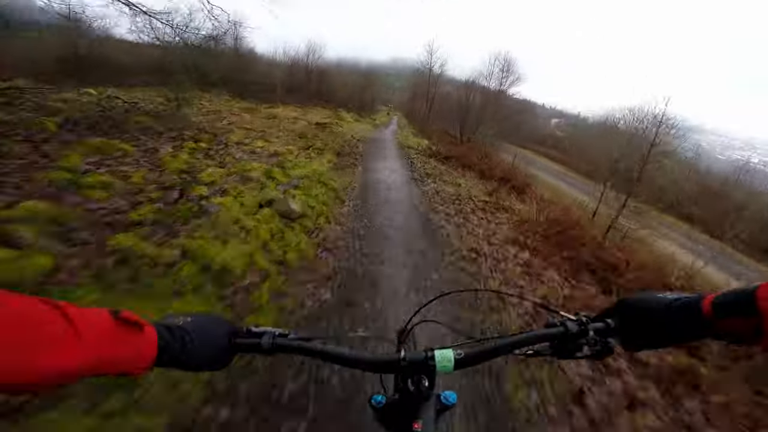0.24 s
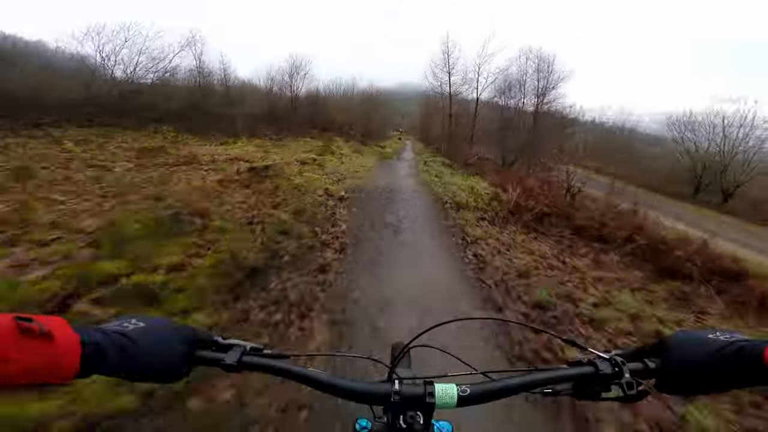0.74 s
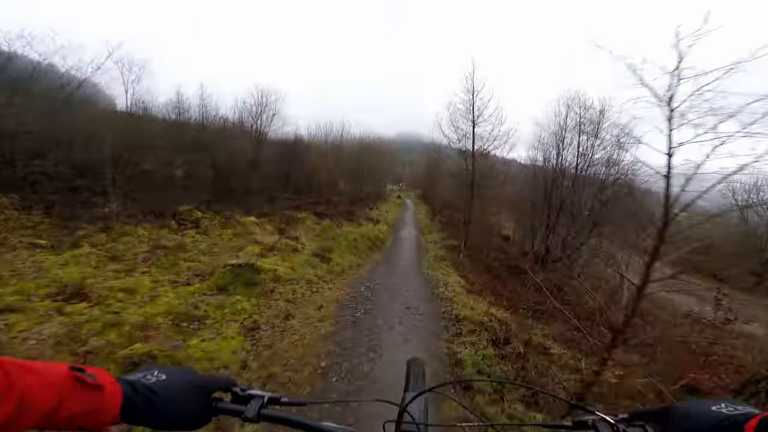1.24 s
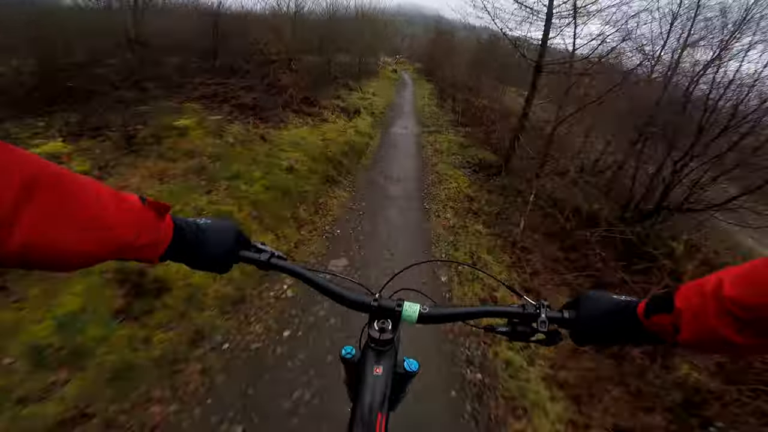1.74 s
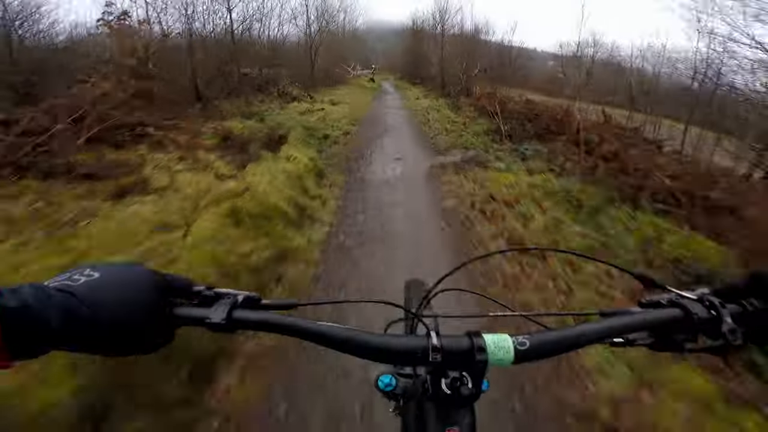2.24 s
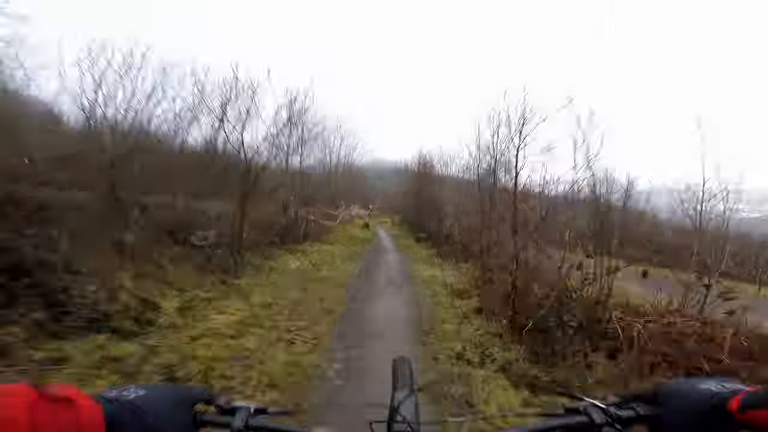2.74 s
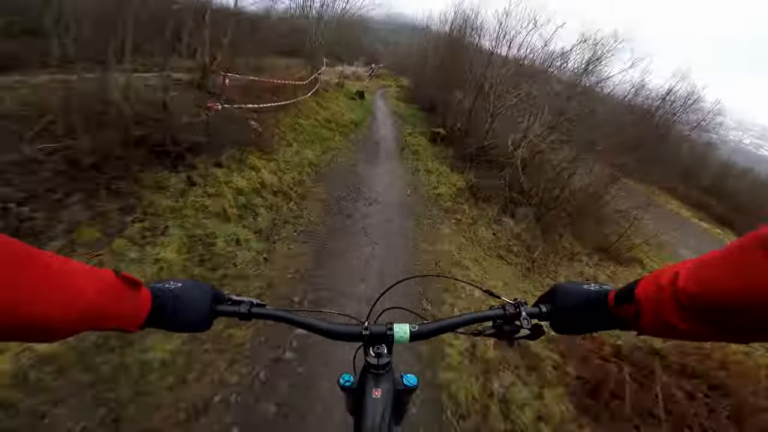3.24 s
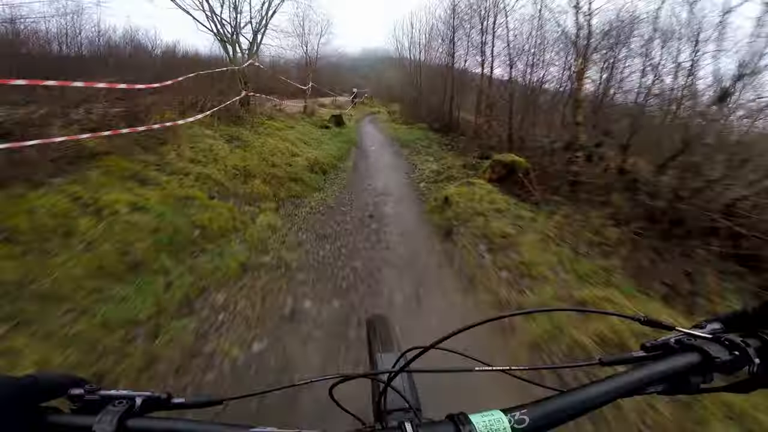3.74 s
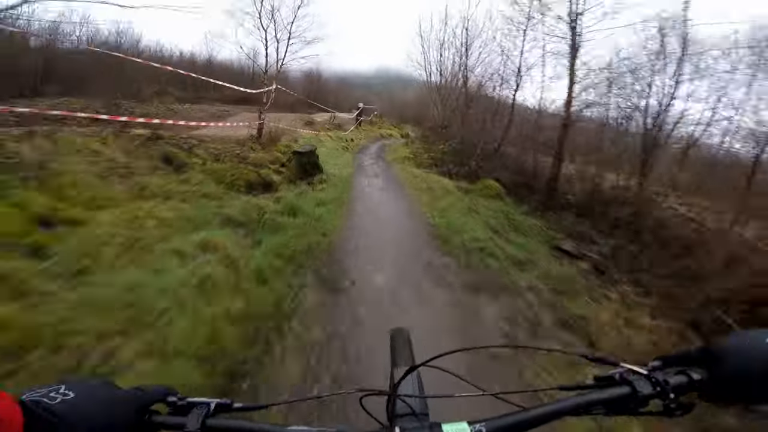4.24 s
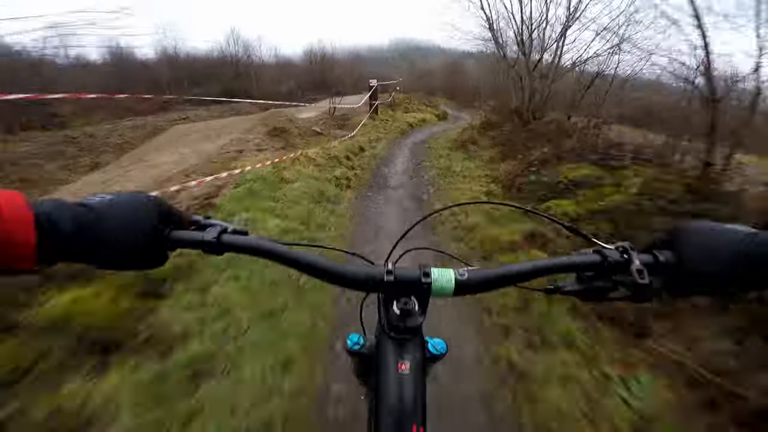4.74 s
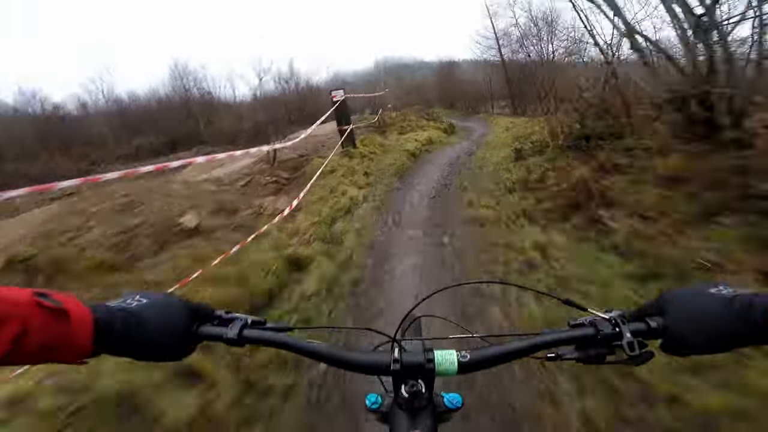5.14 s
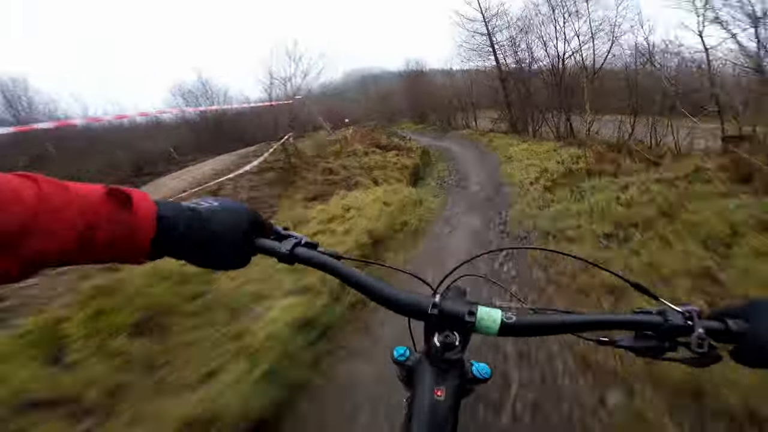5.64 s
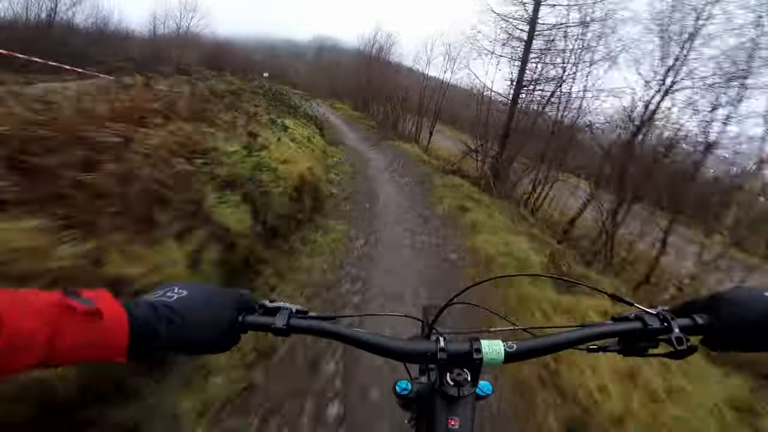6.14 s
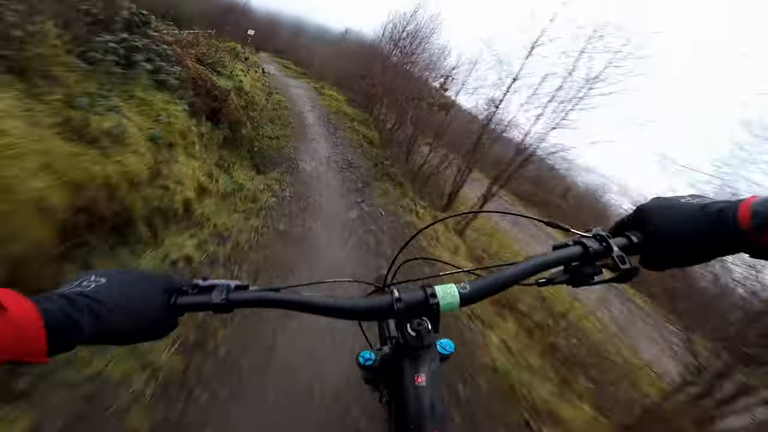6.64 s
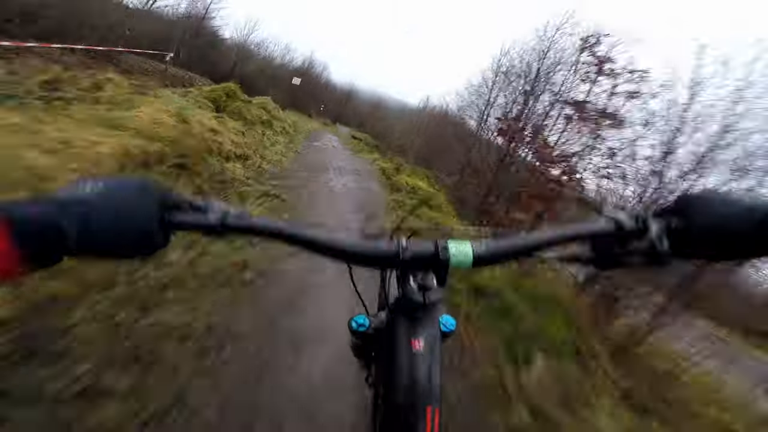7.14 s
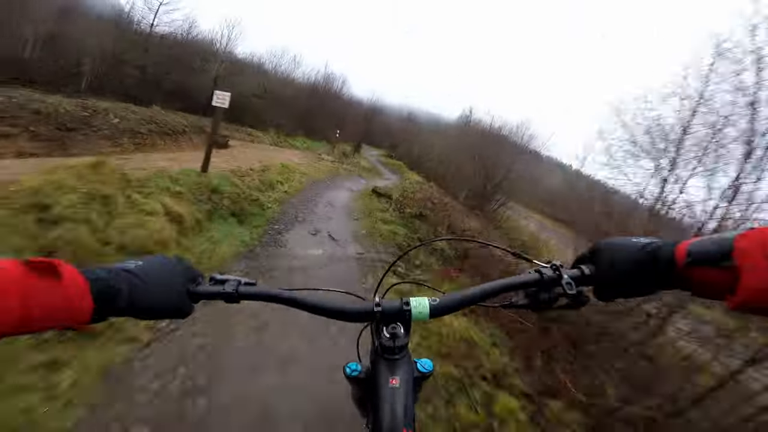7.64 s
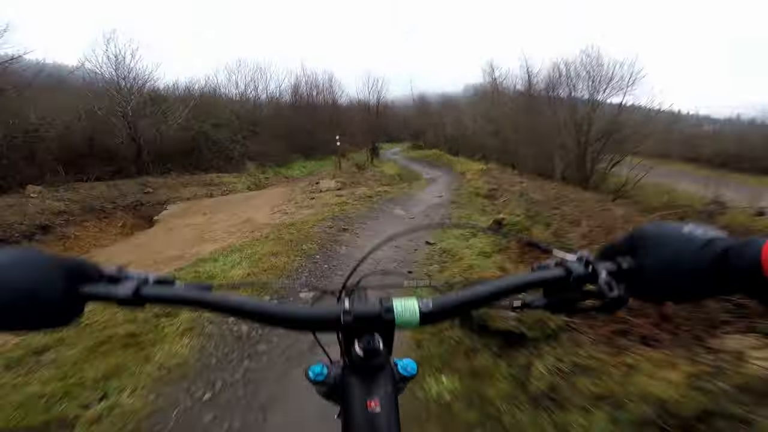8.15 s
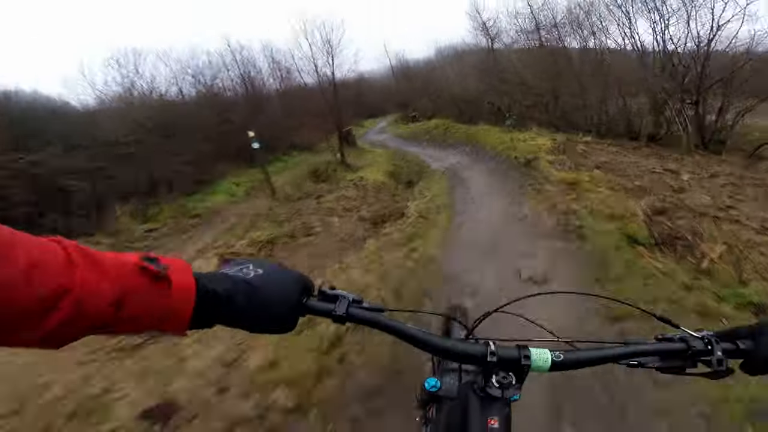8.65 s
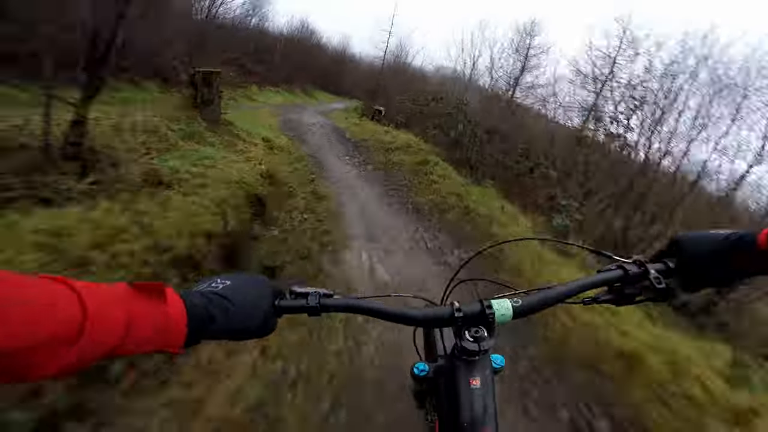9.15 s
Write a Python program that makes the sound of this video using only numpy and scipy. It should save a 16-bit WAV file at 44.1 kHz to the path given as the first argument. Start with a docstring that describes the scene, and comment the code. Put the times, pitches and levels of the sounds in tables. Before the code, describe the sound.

Outdoor ride lasting about 9.4 seconds, heard close from the rider's chest, with no room echo. Gusty wind roars throughout over low, fluttering buffeting, while tyres hiss and crunch on wet gravel. Dry knocks begin at once; a chain rattle comes at 0.9 and a tiny high squeak near 1.1. From 1.2 to 1.8 the wind dulls and the tyres nearly vanish, then a hard cluster of clicks and rattle lands around 2. Another faint squeak comes at 2.7, followed by a lull until a low mount thump at 3.35 and sharp hits with a spray swish at 3.5-3.6. Wind then stays strong and bright until about 7, with a heavy crack at 4.57 and frequent knocks from 5 to 6.7. The densest rattling burst is at 7.0-7.2. Tyres drop away around 7.4, a thump and knock hit at 7.87, and ragged, weaker wind and crunching gravel continue to the end.

```python
"""Wind tears in gusts at a camera on a rider's chest as a mountain bike runs fast down a wet gravel trail. The
air is coloured noise whose level and pitch follow the stream, over slow swings that buffet the microphone. The
tyres are hissing noise and ringing grains of grit, falling quiet where the bike goes light. Stones, cables and
the chain's hardest slaps click as struck modes, the chain rattles in bursts of small slaps in the compressions,
and decaying sines make the camera mount thump; there are also brief squeaks and swishes of spray."""
import sys
import numpy as np
from scipy import signal
from scipy.fft import rfft, irfft, next_fast_len
from scipy.io import wavfile
from scipy.ndimage import uniform_filter1d, map_coordinates

SR = 44100
rng = np.random.default_rng(int(sys.argv[2]) if len(sys.argv) > 2 else 0)


def store_pcm(level_fs):
    """Save levels as 16-bit WAV."""
    pcm = np.round(np.clip(level_fs, -1, 1) * 32767).astype(np.int16)
    wavfile.write(sys.argv[1], SR, np.atleast_2d(pcm).T)


N = 413658
TIME = np.arange(N) / SR

# The bike's dead modes, heard through the camera case.
# Each row: centre pitch in Hz, width in Hz, average strength in dB.
KNOCK_MODES = [(2205, 810, -1), (2654, 960, 6.5), (3170, 1270, 5.5), (3693, 830, -1)]


def from_db(db):
    """Decibels to gain."""
    return 10 ** (np.asarray(db) / 20)


def rms_one(x):
    """Scale to unit rms."""
    return x / np.sqrt(np.mean(x ** 2) + 1e-20)


def in_time(rows):
    """One curve per column after the time in seconds, joined by straight lines."""
    s, *columns = np.transpose(rows)
    return [np.interp(TIME, s, column) for column in columns]


def drift(rate):
    """Random wandering of spread 1: noise through two equal low-pass poles at a rate in Hz."""
    step = 20  # samples between the points of the curve
    settle = 2000  # points left out while the filter settles
    pole = np.exp(-2 * np.pi * rate * step / SR)
    points = rng.standard_normal(N // step + settle + 2)
    slow = signal.lfilter([1], [1, -2 * pole, pole * pole], points)[settle:]
    return np.interp(np.arange(N) / step, np.arange(len(slow)), rms_one(slow))


def colour(x, spectrum):
    """Give x a spectrum that falls away beyond its ends; rms 1."""
    size = next_fast_len(N, True)
    hz = np.maximum(np.arange(size // 2 + 1) * SR / size, 1)
    points_hz, points_db = np.transpose(spectrum)
    skirts = np.minimum(1, np.minimum(hz / points_hz[0], points_hz[-1] / hz)) ** 2
    gain = skirts * from_db(np.interp(np.log(hz), np.log(points_hz), points_db))
    return rms_one(irfft(rfft(x, size) * gain, size)[:N])


def noise(spectrum):
    """Coloured noise of rms 1."""
    return colour(rng.standard_normal(N), spectrum)


def split(x, hz):
    """The parts of x below and above a frequency."""
    low = signal.sosfiltfilt(signal.butter(4, hz, fs=SR, output="sos"), x)
    return low, x - low


def soften(x, hz, order):
    """A contact of finite length has little energy above some frequency."""
    return signal.sosfilt(signal.butter(order, hz, fs=SR, output="sos"), x)


def add(out, s, sound):
    """Mix a short sound in at a time in seconds."""
    start = max(0, int(s * SR))
    out[start:start + len(sound)] += sound[:max(0, N - start)]


def resonance(x, hz, width):
    """One mode, its width in Hz; a unit click leaves unit energy."""
    r, w = np.exp(-np.pi * width / SR), 2 * np.pi * hz / SR
    return np.sqrt((1 - r * r) / 2) * signal.lfilter([1, 0, -1], [1, -2 * r * np.cos(w), r * r], x)


def resonate(x, modes):
    """Ring modes side by side, in alternating sign; white noise keeps its power."""
    out, total = 0, np.linalg.norm(from_db(np.array(modes)[:, 2]))
    for k, (hz, width, db) in enumerate(modes):
        # the tiny offset keeps the silent filter from slowing down
        out = out + (-1) ** k * from_db(db) / total * resonance(x + 1e-18, hz, width)
    return out


def strike(times, level_db, modes, scatter_db=1.0, tilt_db=0, detune_octaves=0.073):
    """Each click rings the modes at a pitch and with strengths of its own, tilted per octave; 0 dB is unit energy."""
    out, click = np.zeros(N), signal.unit_impulse(SR // 100)
    mode_hz, mode_width, mode_db = np.transpose(modes)
    luck = rng.standard_normal((len(times), len(modes) + 1))
    tilts = np.outer(tilt_db, np.log2(mode_hz))
    strengths = from_db(mode_db + tilts + scatter_db * luck[:, 1:])
    pitches = 2 ** (detune_octaves * np.clip(luck[:, 0], -2, 2))
    for s, db, strength, pitch in zip(times, level_db, strengths, pitches):
        ring = 0
        for k in range(len(modes)):
            mode = resonance(click, pitch * mode_hz[k], mode_width[k])
            ring = ring + (-1) ** k * strength[k] * mode
        add(out, s, from_db(db) * ring / np.linalg.norm(ring))
    return out


def floor_hiss(level_db=-58):
    """Faint steady hiss that shows in the lulls."""
    # Colour of the hiss. Each row: frequency in Hz, density in dB per Hz.
    hiss_spectrum = [(4000, 0), (9500, 3), (11500, -8), (15000, -15)]
    return from_db(level_db) * noise(hiss_spectrum)


def buffeting(swing_gain_db=1.5, rumble_gain_db=0.0, lumpy_db=4.5, evenness=0.55):
    """The shaking chest pushes the diaphragm to and fro, over a lumpy rumble of large eddies."""
    # How hard the trail shakes the rider's chest. Each row: time in seconds, relative pressure swing in dB.
    chest_shake = [(0.0, -19), (1.04, -11), (1.56, -33.5), (1.88, -26), (1.93, -7.5), (2.4, -22.5),
                   (2.56, -9), (3.29, -30.5), (3.37, -16), (4.49, -14), (4.65, -19), (6.63, -12.5),
                   (6.76, -21.5), (7.11, -7.5), (7.52, -22.5), (8.07, -12.5), (8.41, -19.5), (9.38, -11.5)]
    # The low rumble over time. Each row: time in seconds, relative level in dB.
    rumble_course = [(0.0, -27.5), (1.5, -32.5), (3.2, -26.5), (4.1, -25), (5.1, -26), (5.7, -23),
                     (6.8, -29.5), (7.8, -29.5), (8.2, -30), (8.8, -25), (9.38, -28.5)]
    # Colours of the swings and of the rumble. Each row: frequency in Hz, density in dB per Hz.
    swing_spectrum = [(5, 0), (10, -10.5), (15, 8), (21, -1.5), (27, 4.5), (36, -10), (48, -16), (70, -51)]
    rumble_spectrum = [(25, -27), (45, 3.5), (70, -2.5), (110, -6.5), (170, -10), (300, -18), (600, -23)]
    shake_db, = in_time(chest_shake)
    rumble_db, = in_time(rumble_course)
    swings = noise(swing_spectrum)
    size = np.abs(signal.hilbert(swings, next_fast_len(N, True)))[:N]
    # successive swings are of much the same size
    swings = rms_one(swings / (uniform_filter1d(size, size=1500) + 0.045) ** evenness)
    rumble = noise(rumble_spectrum) * from_db(lumpy_db * np.clip(drift(rate=57), -2, 2))
    return swings * from_db(shake_db + swing_gain_db) + rumble * from_db(rumble_db + rumble_gain_db)


def gusts(full_wind_db=-23, gust_db=0.43, lull_gust_slope=0.024):
    """The stream wavers several times a second, more widely when it is weak: dB above a full stream."""
    # Strength of the air stream over the camera. Each row: time in seconds, strength in dB as upper rush.
    air_stream = [(0.0, -28), (0.03, -30), (0.095, -21), (0.125, -25), (0.19, -23.5), (0.27, -19.5),
                  (0.41, -22.5), (0.47, -33), (0.53, -24), (0.58, -26), (0.705, -18.5), (0.745, -26.5),
                  (0.79, -24), (0.94, -23.5), (1.04, -30), (1.15, -34), (1.27, -32.5), (1.33, -35),
                  (1.45, -31), (1.55, -35), (1.64, -37), (1.69, -26.5), (1.77, -30), (1.93, -24),
                  (2.01, -31.5), (2.1, -30.5), (2.14, -24.5), (2.28, -21), (2.39, -26), (2.45, -23.5),
                  (2.52, -26.5), (2.59, -25), (2.73, -42.5), (2.81, -31), (2.93, -34.5), (3.0, -33.5),
                  (3.16, -43.5), (3.23, -29.5), (3.46, -19), (3.53, -22), (3.57, -27.5), (3.69, -31),
                  (3.73, -24), (4.07, -22), (4.2, -24), (4.5, -22), (4.58, -26), (4.66, -22), (4.82, -18.5),
                  (4.98, -24.5), (5.06, -23), (5.13, -30), (5.31, -20.5), (5.48, -23), (5.72, -21),
                  (6.02, -21), (6.6, -23), (6.82, -20), (6.97, -21), (7.17, -26), (7.24, -28.5),
                  (7.34, -25.5), (7.39, -30), (7.43, -22.5), (7.47, -28.5), (7.57, -27.5), (7.62, -31),
                  (7.72, -34.5), (7.85, -32.5), (8.06, -31.5), (8.13, -34), (8.21, -38), (8.27, -29),
                  (8.35, -27), (8.42, -34), (8.49, -25), (8.53, -38.5), (8.65, -34.5), (8.81, -27),
                  (8.96, -29.5), (9.07, -25), (9.38, -33)]
    stream_db, = in_time(air_stream)
    excess_db = stream_db - full_wind_db
    depth_db = gust_db + lull_gust_slope * np.clip(-excess_db, 0, 8)
    return excess_db + depth_db * np.clip(drift(rate=11.96), -2, 2)


def puffs(slack_s=0.024, slack_share=1.0, rise_s=0.0057, fall_s=0.011):
    """The flow slackens for an instant before each eddy, then jumps: a level in dB."""
    # The strongest single eddies breaking on the camera.
    # Each row: time of the jump in seconds, relative rise in dB.
    single_eddies = [(0.215, -0.5), (0.482, 6), (0.835, 3.5), (1.262, 0), (1.605, 13), (1.671, 6),
                     (1.697, 6), (2.415, 5.5), (2.81, 6), (2.894, 7), (2.948, 5), (3.003, 6), (3.278, 2.5),
                     (4.602, 3), (5.927, 3), (7.421, 7), (7.636, 5), (7.787, 6.5), (7.998, 4), (8.696, 7.5),
                     (8.777, 8.5), (8.878, 6), (8.997, 7)]
    out, t = np.zeros(N), TIME[:SR // 10]
    corners_s = np.cumsum([0, slack_s, rise_s, fall_s])
    shape = np.interp(t, corners_s, [0, -slack_share, 1, 0])
    for s, db in single_eddies:
        add(out, s - slack_s - rise_s / 2, db * shape)
    return out


def with_the_flow(x, gust_db, shift_octaves, octaves_per_db=0.04):
    """Faster air sheds faster eddies: the whole roar slides up in a gust and down in a lull."""
    speed = 2 ** (shift_octaves + octaves_per_db * np.clip(gust_db, -6, 6))
    return map_coordinates(x, [np.cumsum(speed) % (N - 1)], order=3, mode="mirror")


def wind(low_db=-20.0, middle_db=-19.5, edge_db=-19.5, flutter_db=1.0, tear_db=0.66, patchy_db=2.0,
         lull_slope=0.18, evenness=0.5, puff_share=0.94):
    """Eddies shed by the camera: fast air is a bright, even roar; in the lulls it turns dull and ragged."""
    # Colour of the rush in a full stream. Each row: frequency in Hz, density in dB per Hz.
    rush_spectrum = [(90, -3.5), (170, -1.5), (300, 0.5), (560, 1), (850, -2.5), (1350, -2.5), (1700, -8.5),
                     (2080, -17), (2750, -24), (3600, -33.5), (4600, -54), (5700, -52), (9600, -45),
                     (15000, -77)]
    # The low part of the rush, against the rest. Each row: time in seconds, added level in dB.
    low_roar = [(0.0, 3), (0.35, -1.5), (0.8, 1), (0.9, 6), (1.02, -3), (1.45, 4.5), (1.56, -1), (1.9, 0.5),
                (2.65, 0), (2.83, 3.5), (3.15, -3.5), (3.65, -3), (4.5, -2), (5.1, 0.5), (5.5, 1),
                (6.9, -0.5), (7.4, -0.5), (8.0, -0.5), (8.38, 1.5), (8.7, -1.5), (9.05, 5), (9.38, -1.5)]
    # The roar brightens and dulls as the stream meets the camera at changing angles.
    # Each row: time in seconds, shift in octaves.
    angle_shift = [(0.0, -0.022), (0.18, 0.015), (0.26, 0.12), (0.35, 0.0033), (0.88, -0.065),
                   (1.03, 0.083), (1.35, -0.19), (1.7, 0.0012), (1.78, -0.14), (2.0, -0.0095), (2.38, 0.12),
                   (2.46, -0.053), (2.68, 0.083), (3.0, 0.1), (3.15, -0.085), (3.48, 0.076), (4.02, -0.05),
                   (4.07, 0.2), (4.13, -0.04), (4.35, -0.12), (4.42, 0.05), (5.5, -0.044), (5.9, -0.069),
                   (6.9, -0.0043), (7.3, -0.066), (7.44, 0.098), (7.7, -0.046), (8.12, 0.15), (8.32, -0.14),
                   (8.5, 0.0073), (9.38, 0.0029)]
    gust_db = gusts()
    roar_db, = in_time(low_roar)
    shift_octaves, = in_time(angle_shift)
    body, edge = split(with_the_flow(noise(rush_spectrum), gust_db, shift_octaves), hz=1090)
    low, middle = split(body, hz=390)
    ragged = 1 + lull_slope * np.clip(-gust_db, 0, 8)
    flutter = flutter_db * np.clip(drift(rate=48), -2, 2)
    eddies_db = ragged * (flutter + tear_db * drift(rate=126))
    # each part gains so many dB for each dB of the stream, the edge most
    parts = [(low, low_db + roar_db + 0.79 * gust_db),
             (middle, middle_db + 0.92 * gust_db),
             (edge, edge_db + 1.03 * gust_db)]
    rush = 0
    for part, db in parts:
        # a steady stream keeps its strength from one twentieth of a second to the next
        swell = rms_one(np.sqrt(uniform_filter1d(part ** 2, size=2400) + 1e-12))
        rush = rush + part / swell ** evenness * from_db(db + patchy_db * drift(rate=134))
    return rush * from_db(eddies_db + puff_share * puffs())


def thumps(cycles=0.43):
    """The camera rocks on its harness: a sine that dies away within about one cycle."""
    # Camera mount thumps. Each row: start in seconds, level in dB before the decay, pitch in Hz.
    mount_thumps = [(1.449, -7.5, 116.9), (3.351, 0, 64), (7.868, -3, 110.1)]
    out, t = np.zeros(N), TIME[:SR // 10]
    for s, db, hz in mount_thumps:
        decay = np.exp(-(t * hz / cycles) ** 2)
        add(out, s, from_db(db) * np.sin(2 * np.pi * hz * t) * decay)
    return out


def squeaks(waver_hz=190):
    """A rough, gliding whistle while the pad grazes the rotor and keeps catching and slipping."""
    # Brief squeaks of a brake rotor, around whose glide the pitch wavers.
    # Each row: start in seconds, length in seconds, first pitch in Hz, last pitch in Hz, level in dB at the crest.
    rotor_squeaks = [(1.073, 0.065, 5800, 6670, -35.5), (2.738, 0.042, 7050, 6660, -39)]
    out, waver = np.zeros(N), waver_hz * drift(rate=900)
    grip = rms_one(1 + drift(rate=700))
    for s, length, start_hz, end_hz, db in rotor_squeaks:
        count = int(length * SR)
        pitch = np.linspace(start_hz, end_hz, count) + waver[:count]
        whistle = np.sqrt(2) * np.sin(2 * np.pi * np.cumsum(pitch) / SR)
        add(out, s, from_db(db) * np.hanning(count) * grip[:count] * whistle)
    return out


def sprays():
    """A short, very high swish, as of water pressed out from under the tyre."""
    # Wet spray in the hardest compressions.
    # Each row: start in seconds, length in seconds, rms level in dB at the crest.
    swishes = [(1.952, 0.032, -47), (3.535, 0.034, -50), (3.622, 0.02, -39)]
    # Colour of the spray. Each row: frequency in Hz, density in dB per Hz.
    spray_spectrum = [(10000, -12), (12200, 0), (15000, -5)]
    level = np.zeros(N)
    for s, length, db in swishes:
        add(level, s, from_db(db) * np.hanning(int(length * SR)))
    return level * noise(spray_spectrum)


def rattles(level_db=-3.0, sizzle_db=-11.0, ring_db=-12.0, links_per_s=1000, clump_db=4.0,
            swell_share=0.24, fade_share=0.8, even_ring_db=-22.5, ring_slope=1):
    """Chain links slap in a dense burst as the bike bottoms out; the harder the slap, the brighter the metal rings."""
    # Chain and drivetrain rattles.
    # Each row: start in seconds, relative level in dB, time scale of swell and fade in seconds.
    chain_bursts = [(0.868, -26.5, 0.034), (1.033, -32, 0.039), (1.913, -25, 0.074), (2.034, -16.5, 0.0042),
                    (2.563, -29.5, 0.083), (2.65, -30, 0.03), (3.534, -26, 0.039), (3.626, -14, 0.0054),
                    (4.521, -24, 0.023), (4.995, -24, 0.014), (5.086, -25.5, 0.022), (6.101, -20.5, 0.0067),
                    (6.432, -24.5, 0.063), (7.015, -21, 0.023), (7.052, -24, 0.023), (7.085, -23, 0.0045),
                    (7.111, -24, 0.018), (7.146, -16, 0.0032), (7.179, -19.5, 0.012), (7.816, -36, 0.027),
                    (7.959, -24, 0.012), (8.075, -32, 0.041)]
    # Colour of the slapping links. Each row: frequency in Hz, density in dB per Hz.
    chain_spectrum = [(1200, 14), (2100, 9), (2700, 13.5), (3600, 9), (4800, 2), (6200, 7), (8000, -19),
                      (10500, -11), (15000, -28)]
    # The ring of the chain and its guide. Each row: pitch in Hz, width in Hz, strength in dB.
    chain_modes = [(2870, 89, -1.5), (3940, 170, 2), (5220, 300, -2.5), (6700, 96, -2), (7600, 410, -5.5),
                   (8880, 120, -6), (10500, 350, -14), (13600, 1800, -21)]
    burst, bright, t = np.zeros(N), np.zeros(N), TIME[:SR // 5]
    for s, db, length in chain_bursts:
        progress = t / length
        swell = np.minimum(1, progress / swell_share)
        shape = swell * np.exp(-np.maximum(0, progress - .6) / fade_share)
        add(burst, s, from_db(db) * shape)
        # slaps above the even level ring brighter by ring_slope dB per dB
        add(bright, s, from_db(db + ring_slope * (db - even_ring_db)) * shape)
    touches = rng.random(N) < links_per_s / SR
    clumps = from_db(clump_db * np.clip(drift(rate=120), -2, 2))
    links = rms_one(touches * clumps * rng.choice([-1, 1], N))
    clack, sizzle = split(colour(links, chain_spectrum), hz=6850)
    ring = resonate(bright * links, chain_modes)
    return from_db(level_db) * burst * clack + from_db(sizzle_db) * bright * sizzle + from_db(ring_db) * ring


def pebbles(hiss_db, per_s=26, gain_db=19.5, spread_db=4.5, top_hz=4300):
    """Small stones flung against frame and mudguard, harder where the tyres bite."""
    draws = rng.random((1500, 3))
    kept = draws[:, 2] < per_s * TIME[-1] / len(draws)
    moment, size, _ = draws[kept].T
    times = moment * TIME[-1]
    # the smaller the draw, the louder the stone
    level_db = np.interp(times, TIME, hiss_db) + gain_db - spread_db * np.log(np.maximum(size, .06))
    return soften(strike(times, level_db, KNOCK_MODES[1:], detune_octaves=0.11), top_hz, order=4)


def knocks(knock_gain_db=-6.5, snap_gain_db=-5.0, thud_gain_db=-8.5, crack_gain_db=-3.0, crack_slope=2.2,
           chatter_db=-13, chatter_s=0.0018):
    """Dry clicks over a dull thud, each followed by a moment of faint chatter from loose parts."""
    # The loudest hits on the bike: stones and cables, and the hard first contacts of chain slaps. Each row:
    # time in seconds, relative knock level in dB, # relative snap level in dB, brightness of the knock in dB
    # per octave.
    frame_hits = [(0.0302, 0.5, -22, 0), (0.097, -2, -26, -3), (0.4832, 0, -24, -3), (0.6467, 2, -7.5, 27),
                  (1.0014, 6, -17, 3), (1.0686, -1, -19, 0), (1.1606, -10, -29, 0), (1.1749, 2.5, -2.5, 6),
                  (1.285, -11.5, -32, 0), (1.392, -13, -32, 3), (1.52, -9, -25, 1), (1.7188, -10, -32, 0),
                  (1.9256, -7, -14, 0), (1.9525, 5, -11, 2), (1.973, 1, -6, 2), (2.0354, -1, -4, 5),
                  (2.0712, 1, -12, 2), (2.0805, 3, -1, 6), (2.0843, 7.5, -6, 3), (2.105, -1, -14, 3),
                  (2.4217, 4.5, -11, 0), (2.5051, 0, -7, 1), (2.521, 4.5, 1, -5), (2.7748, 4.5, 2, -6),
                  (2.8595, -9, -20, 0), (2.896, -5, -22, -14), (2.97, -8.5, -33, -6),
                  (3.0958, 1, -9.5, -9.5), (3.3262, -5, -20, -6), (3.3719, -3, -11, -7),
                  (3.4973, -6, -9, 5), (3.539, 7, -15, 10.5), (3.5435, 10, -4.5, -4), (3.551, 1, -9, 0),
                  (3.6173, 6, -15.5, -12), (3.6292, 12, 0, -9), (3.9313, -10, -28, -2),
                  (4.1279, -13, -14, 0), (4.1763, -1, -13, 3), (4.4257, 1, -8, 3), (4.4524, -1, -5, 16),
                  (4.5707, 12.5, 2, 2), (4.5743, 15, 3, -2), (4.613, -7, -26, 4.5), (4.7085, 0, -19, 0),
                  (4.753, 1, -5, 10), (4.9839, 4.5, -8, 7), (4.9989, 4, -13, 0), (5.012, 0, -11, 3),
                  (5.0393, 7, 0, 13), (5.049, -9, -16, 3), (5.1136, -4, -15, 0), (5.1807, 3, -12, 0),
                  (5.1962, 8, -11, -11), (5.4014, 10, -8, -3), (5.408, -2, -22, 2), (5.8312, -2, -14, 0),
                  (5.9873, -8, -5, 3), (6.0277, -4, -14, 3), (6.074, 0, -14, 2), (6.1576, 9.5, -5, -2),
                  (6.1918, 2, -15, 4), (6.2705, -2, -19, 0), (6.3107, -9, -8.5, 2), (6.3616, 0, -12, 4),
                  (6.4362, 9.5, -5, 7), (6.4743, 4, -2.5, 2), (6.4952, -7, -16, 0), (6.5459, -3, -22, -2),
                  (6.724, 5, -6, -5), (6.7296, 0, -6, 3), (6.7524, -7, -11, 3), (6.9616, -4, -11, 0),
                  (7.016, 4.5, -7, 9), (7.0595, 2, -8, 3.5), (7.0903, 8, 0, 10), (7.11, -3, -5, 3),
                  (7.1225, 8, -13, 7), (7.1255, 7, -9, 7), (7.1479, 11, -0.5, 18), (7.169, 4, -4, -3),
                  (7.1895, 3, -5, 3.5), (7.1956, -9, -8, 3), (7.3609, -9, -9, 0), (7.3842, -11, -18, 0),
                  (7.4371, -9, -15, -13), (7.745, 1, -13, 5), (7.7635, 0.5, -8, -1), (7.826, -11, -11, 0),
                  (7.8686, 11, -4, -8), (7.9574, 1, -17, 0), (7.9713, -6, -5, 5), (8.0003, 3, -10, -3),
                  (8.1722, 2, -16, -1), (8.184, 1.5, -13, -4), (8.3168, -9, -21, 0), (8.4535, -11, -21, 0),
                  (8.4595, 0, -17, 4), (8.5438, -5, -24, 0), (8.6748, 1, -13, 0), (8.6987, 1, -13, 2),
                  (8.7486, -5, -22, 0), (8.7855, 1, -19, -0.5), (8.7997, -3, -10, 2), (8.8182, 0.5, -10, 6),
                  (8.8781, -9, -14, -3), (8.998, -4, -20, -3), (9.0375, -9, -19, 0), (9.2977, -9, -4, 3),
                  (9.3176, -12, -19, 0)]
    # Modes of the high snap, the topmost crack and the dull thud.
    # Each row: centre pitch in Hz, width in Hz, average strength in dB.
    snap_modes = [(5840, 490, 0.35), (7120, 1800, 2.1), (8160, 1900, -1.5)]
    crack_modes = [(4570, 1700, 2), (10100, 1400, 2.5), (12800, 2800, -17)]
    thud_modes = [(330, 1100, 0.78), (617, 130, 1.4), (1510, 370, 0.15)]
    times, knock_db, snap_db, tilt_db = np.transpose(frame_hits)
    knock = strike(times, knock_db + knock_gain_db, KNOCK_MODES, tilt_db=tilt_db)
    snap = strike(times, snap_db + snap_gain_db, snap_modes)
    # only hard contacts, with much snap for their knock, crack right up to the top
    hardness_db = np.minimum(snap_db - knock_db, -5)
    crack = strike(times, snap_db + crack_gain_db + crack_slope * hardness_db, crack_modes)
    thud = strike(times, knock_db + thud_gain_db, thud_modes)
    clicks = soften(knock, hz=4130, order=7) + soften(snap, hz=8600, order=5)
    clicks += crack + soften(thud, hz=1810, order=4)
    t, chatter = TIME[:SR // 100], np.zeros(N)
    tails = rng.standard_normal((len(times), len(t))) * np.sqrt(t) * np.exp(-t / chatter_s)
    for s, tail in zip(times, tails):
        click = clicks[int(s * SR):][:len(t)]
        add(chatter, s, np.convolve(click, tail / np.linalg.norm(tail)))
    return clicks + from_db(chatter_db) * chatter


def tyres(hiss_db, hiss_gain_db=-1.5, grit_gain_db=-3.0, grains_per_s=900, grain_spread_db=2.5,
          judder_db=2.0, grain_cycles=6.1):
    """Wet tread hisses; under it grit crunches in clumps, each grain ringing briefly at one of twelve pitches."""
    # Colour of tread and grit. Each row: frequency in Hz, density in dB per Hz.
    gravel_spectrum = [(900, -2), (2000, 8), (2650, 12.5), (3400, 7), (4500, -1.5), (5650, 3), (7000, -3),
                       (8300, -5.5), (9700, -5), (11300, -16), (13000, -16), (15000, -24)]
    born = rng.random(N) < grains_per_s * from_db(4 * drift(rate=14)) / SR
    strengths = from_db(grain_spread_db * np.minimum(rng.exponential(1, N), 4))
    grains = born * strengths * rng.choice([-1, 1], N)
    pitches = np.geomspace(2000, 8000, 12)
    dealt = rng.integers(0, len(pitches), N)
    grit = 0
    for k, hz in enumerate(pitches):
        grit = grit + resonance(grains * (dealt == k) + 1e-18, hz, hz / grain_cycles) * np.sqrt(hz)
    hiss = from_db(hiss_gain_db) * noise(gravel_spectrum)
    tread = hiss + from_db(grit_gain_db) * colour(grit, gravel_spectrum)
    return tread * from_db(hiss_db + judder_db * drift(rate=25))


def scene():
    """Air and bike, close up and in the open."""
    # How hard the tyres bear on the gravel, as their hiss. Each row: time in seconds, relative level in dB.
    tyre_bite = [(0.0, -41), (0.78, -42), (0.99, -34.5), (1.2, -51), (1.33, -57), (1.6, -53), (1.85, -46),
                 (2.0, -37.5), (2.2, -43.5), (2.66, -39), (2.87, -53.5), (3.16, -53.5), (3.37, -43.5),
                 (3.55, -35), (3.84, -40.5), (4.91, -42), (5.02, -38.5), (5.17, -35), (5.5, -40),
                 (6.11, -37.5), (6.74, -40), (6.97, -37.5), (7.1, -31), (7.22, -39), (7.33, -44),
                 (7.39, -51.5), (7.71, -46.5), (7.97, -36.5), (8.12, -39.5), (8.23, -46.5), (8.43, -45.5),
                 (8.52, -41.5), (8.8, -38), (9.2, -39), (9.38, -33)]
    hiss_db, = in_time(tyre_bite)
    air = floor_hiss() + buffeting() + wind()
    bike = squeaks() + sprays() + rattles() + pebbles(hiss_db) + knocks() + tyres(hiss_db)
    return (air + thumps() + bike)[None]


def record(dry):
    """The highest peaks are rounded and the top is cut."""
    rounded = dry / (1 + (dry / .95) ** 6) ** (1 / 6)
    cutoff_hz = 15050
    return signal.sosfilt(signal.ellip(10, .2, 80, cutoff_hz, fs=SR, output="sos"), rounded)


dry = scene()
out = record(dry)
store_pcm(out)
```